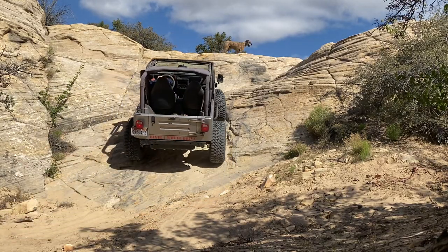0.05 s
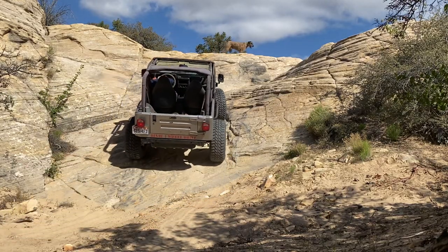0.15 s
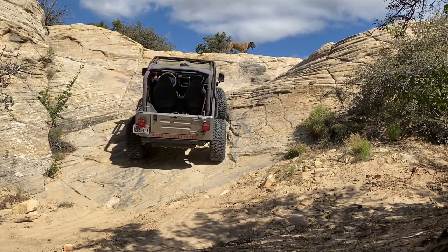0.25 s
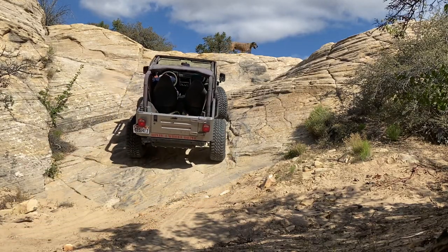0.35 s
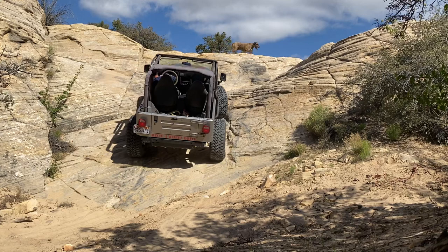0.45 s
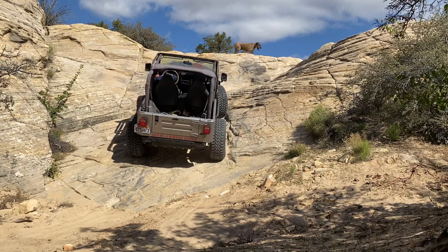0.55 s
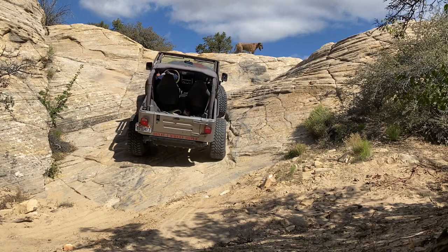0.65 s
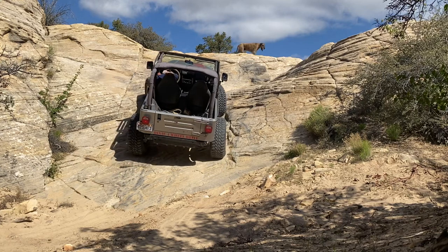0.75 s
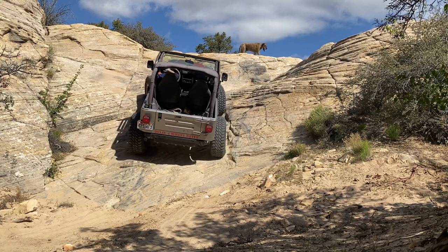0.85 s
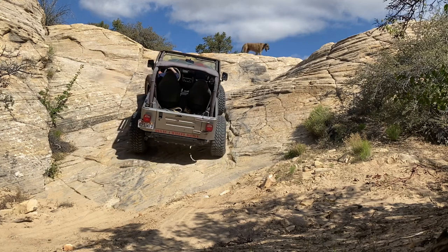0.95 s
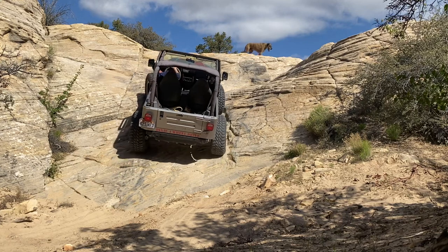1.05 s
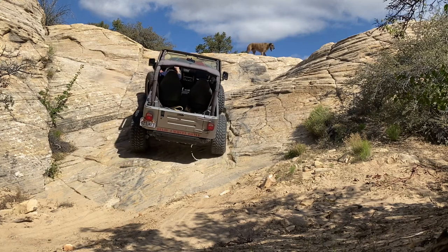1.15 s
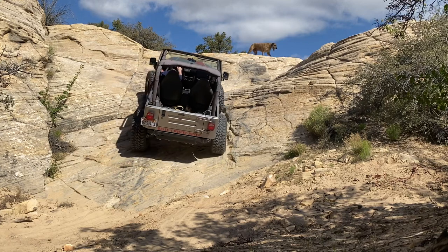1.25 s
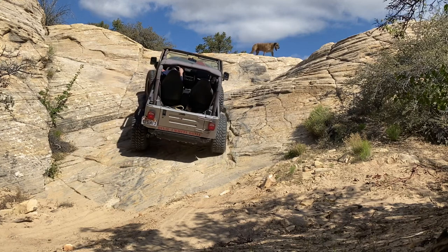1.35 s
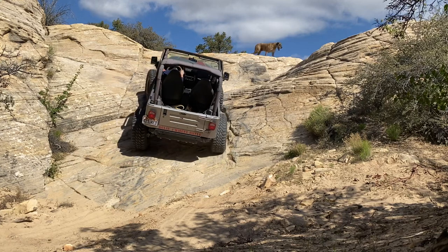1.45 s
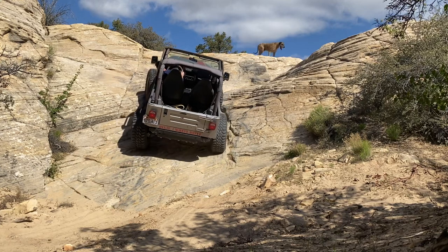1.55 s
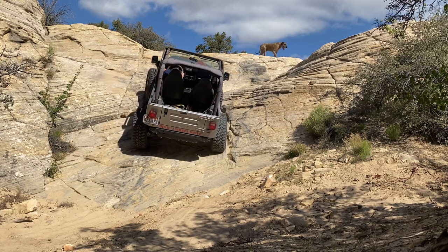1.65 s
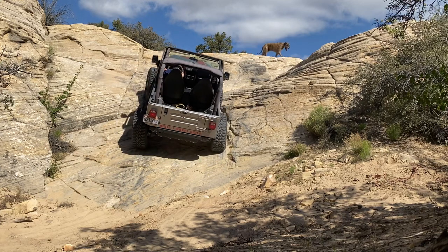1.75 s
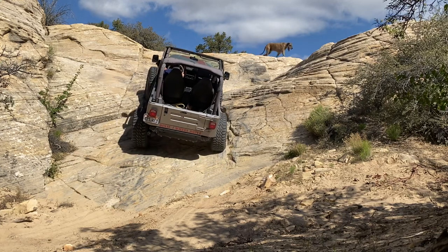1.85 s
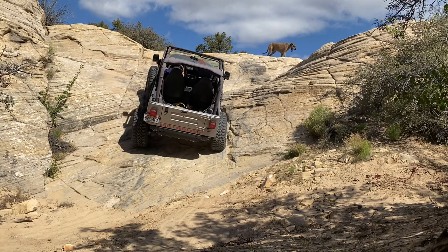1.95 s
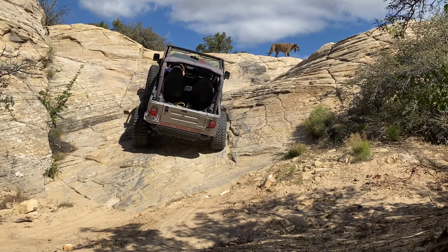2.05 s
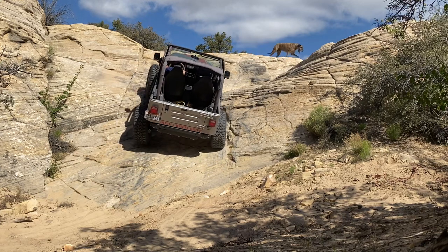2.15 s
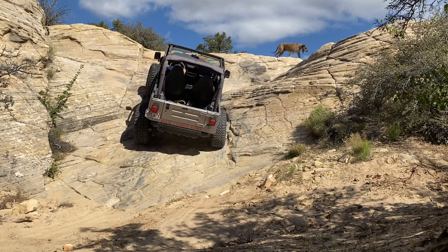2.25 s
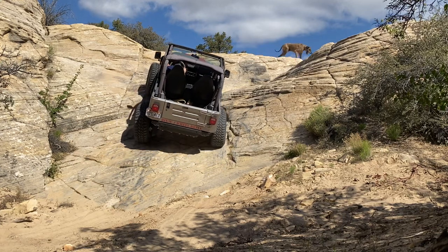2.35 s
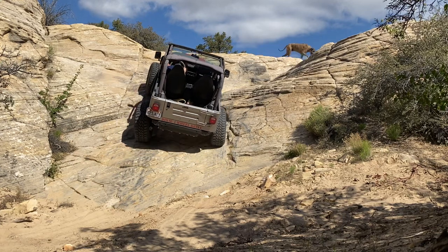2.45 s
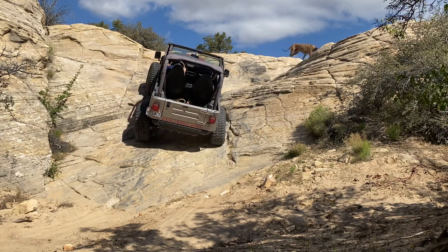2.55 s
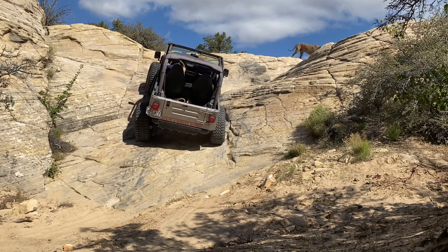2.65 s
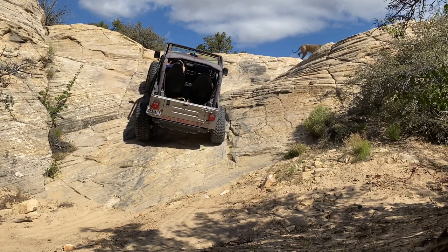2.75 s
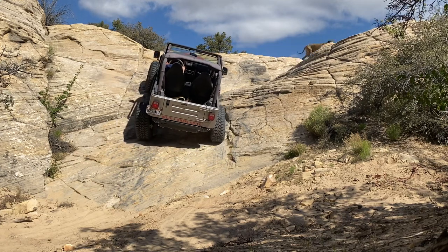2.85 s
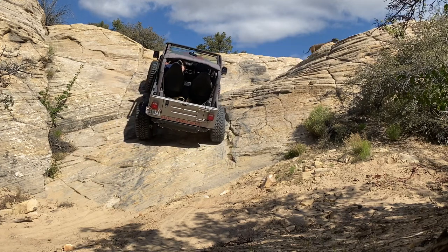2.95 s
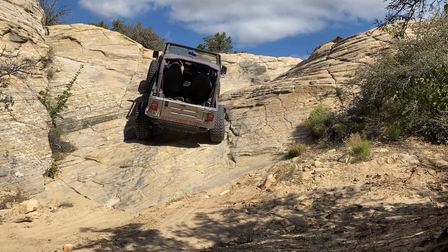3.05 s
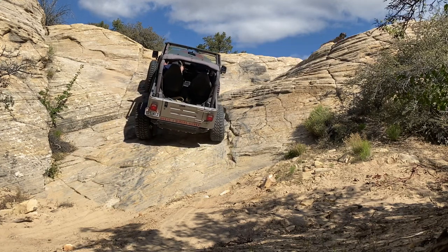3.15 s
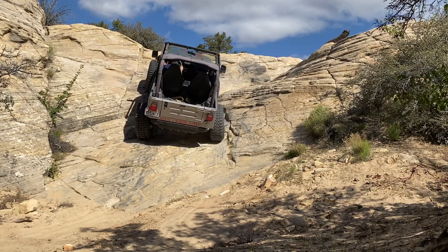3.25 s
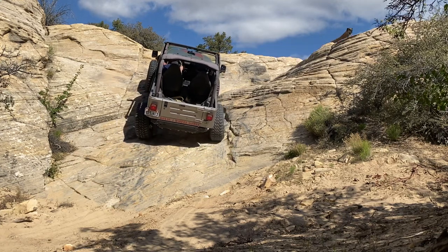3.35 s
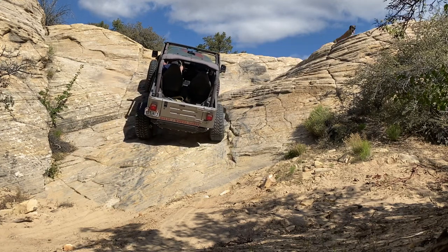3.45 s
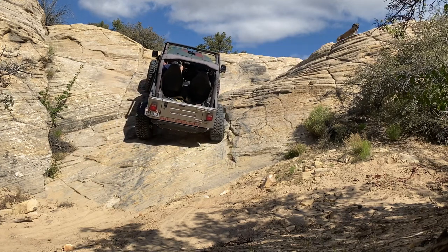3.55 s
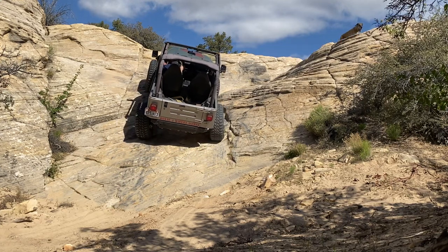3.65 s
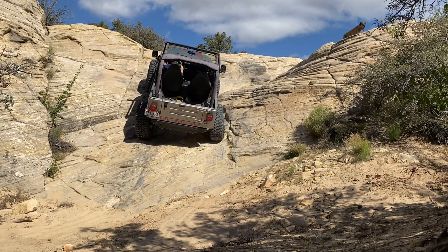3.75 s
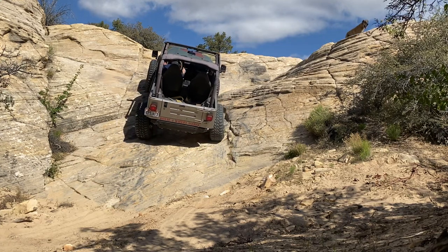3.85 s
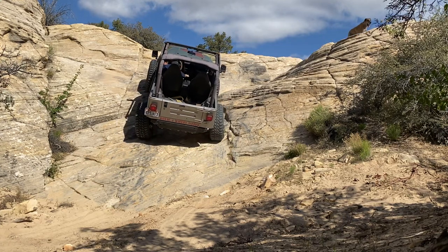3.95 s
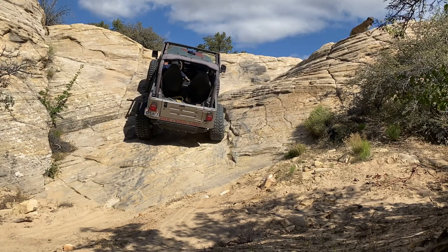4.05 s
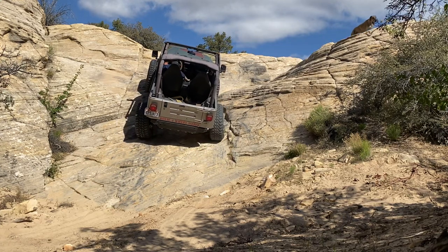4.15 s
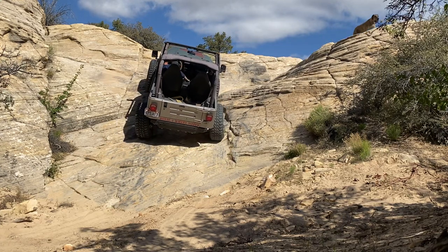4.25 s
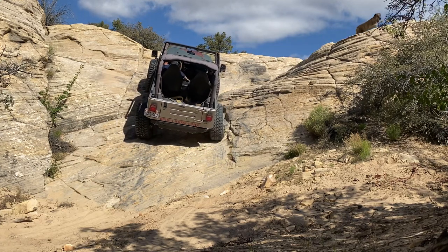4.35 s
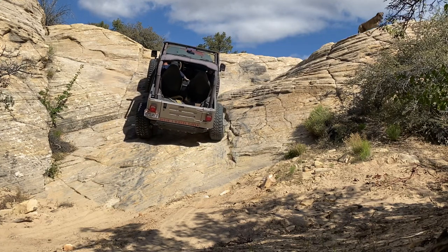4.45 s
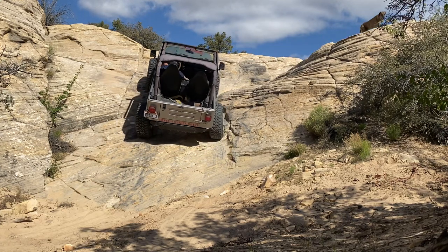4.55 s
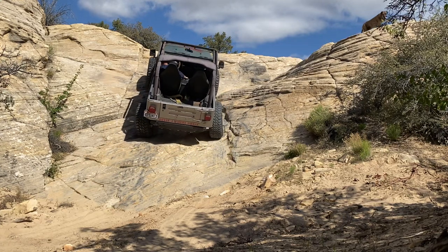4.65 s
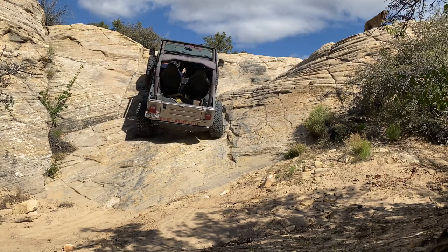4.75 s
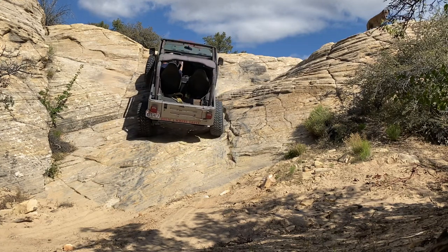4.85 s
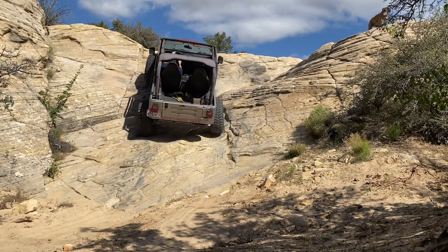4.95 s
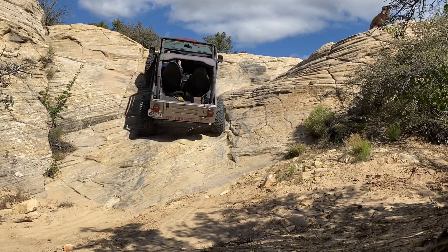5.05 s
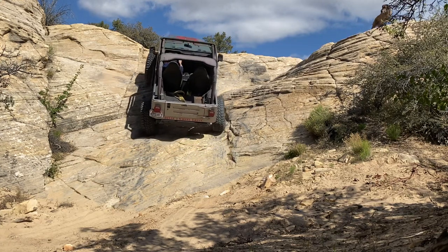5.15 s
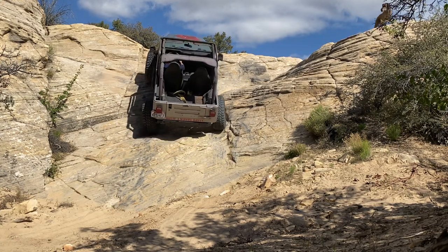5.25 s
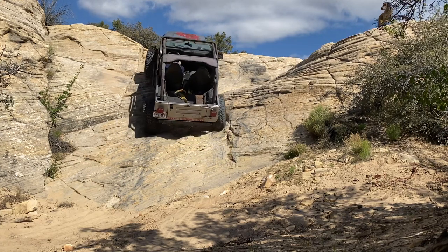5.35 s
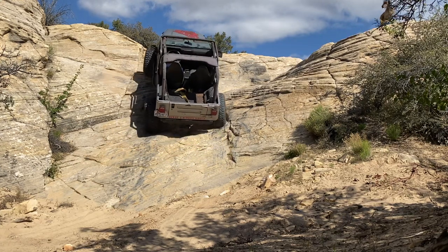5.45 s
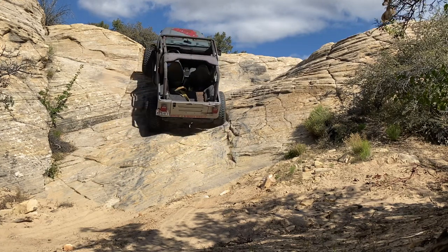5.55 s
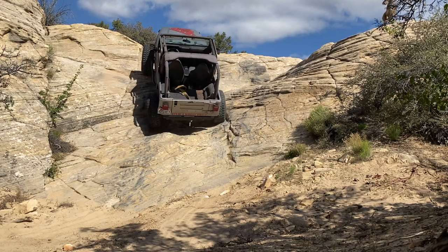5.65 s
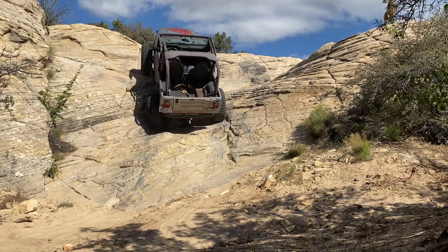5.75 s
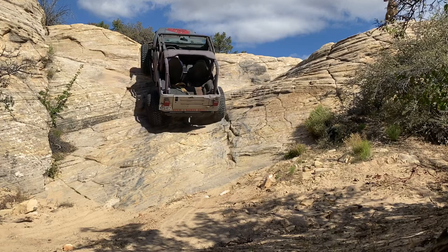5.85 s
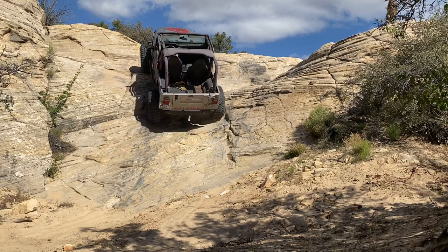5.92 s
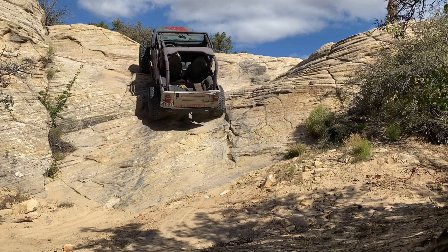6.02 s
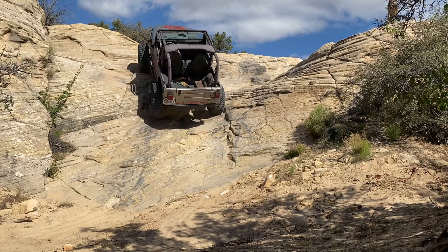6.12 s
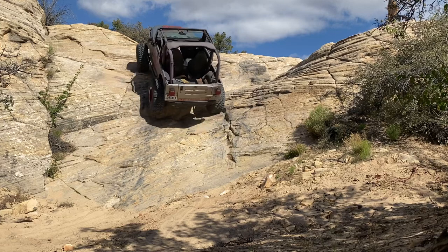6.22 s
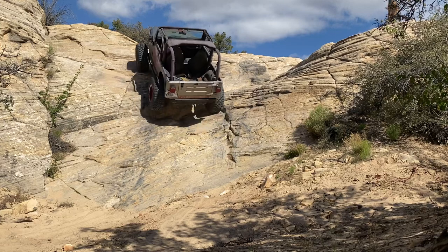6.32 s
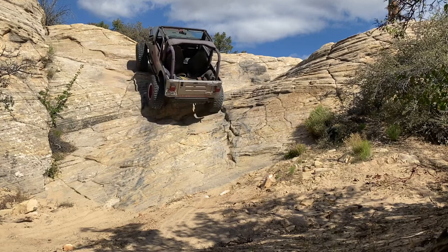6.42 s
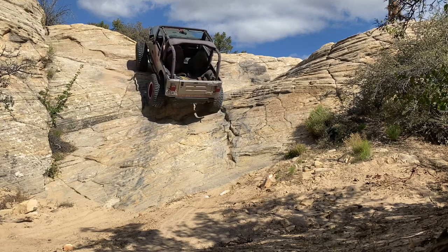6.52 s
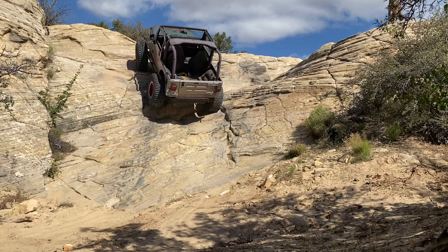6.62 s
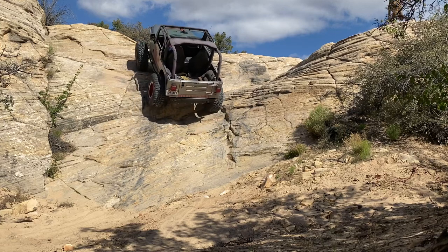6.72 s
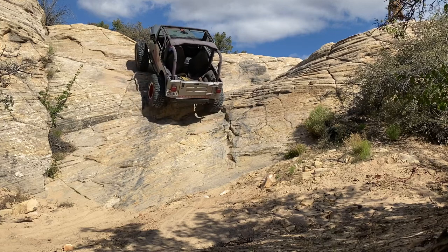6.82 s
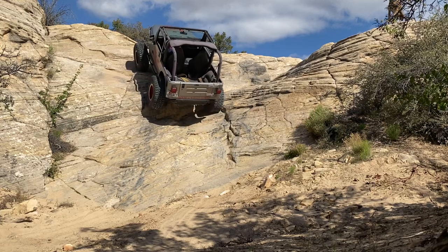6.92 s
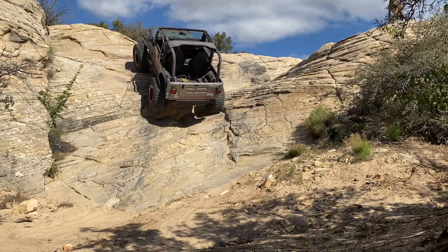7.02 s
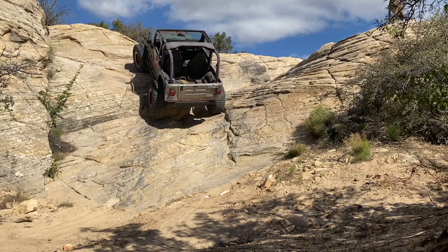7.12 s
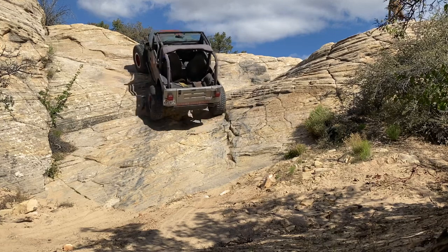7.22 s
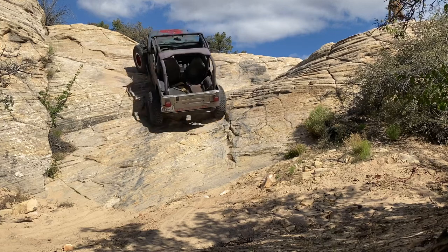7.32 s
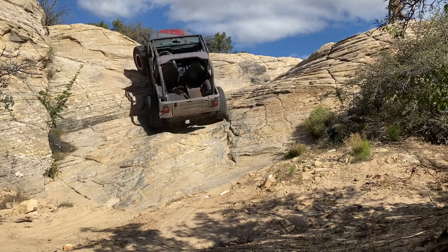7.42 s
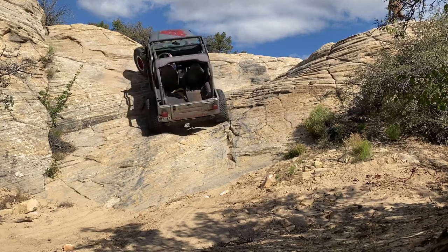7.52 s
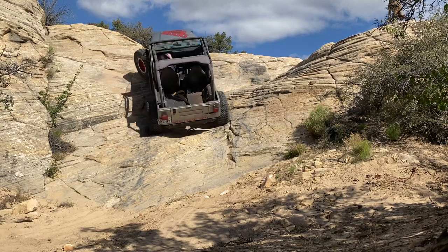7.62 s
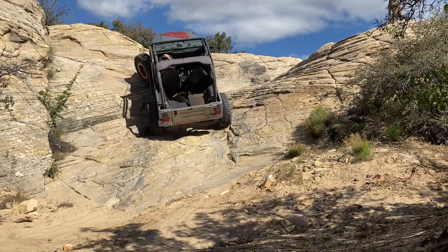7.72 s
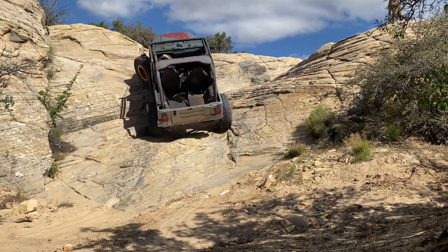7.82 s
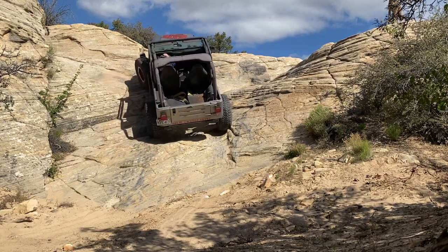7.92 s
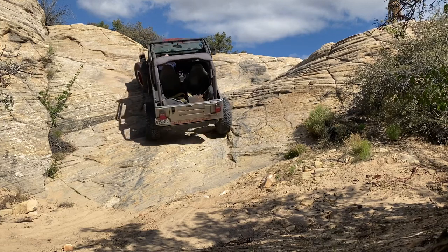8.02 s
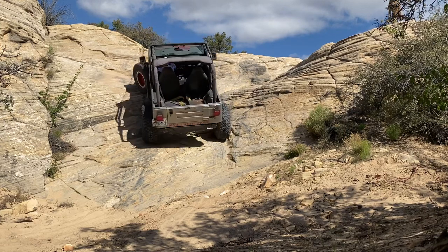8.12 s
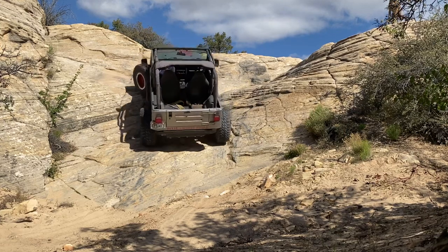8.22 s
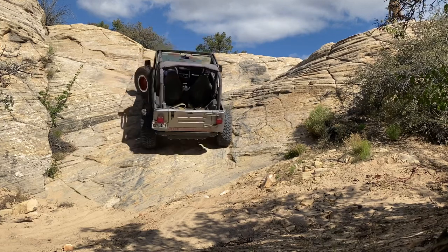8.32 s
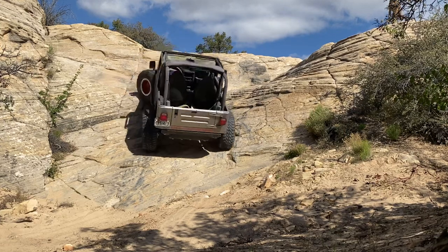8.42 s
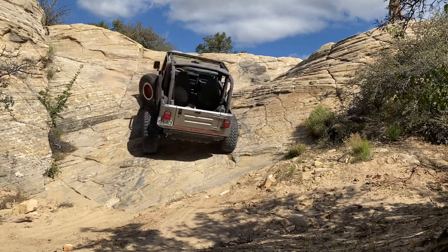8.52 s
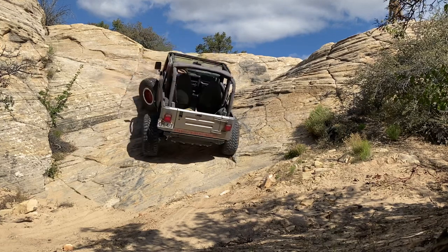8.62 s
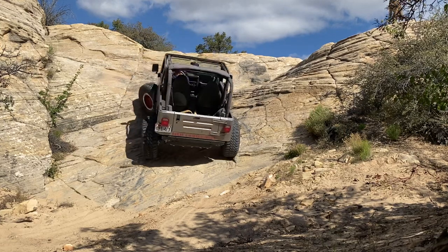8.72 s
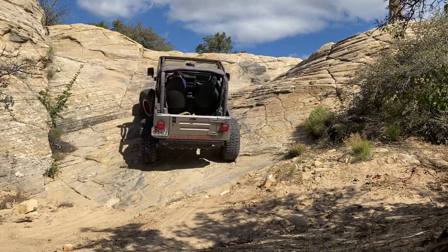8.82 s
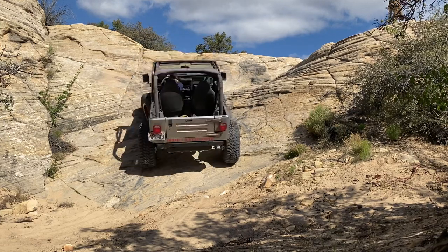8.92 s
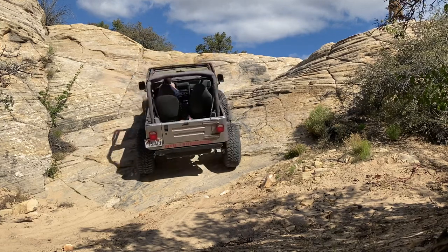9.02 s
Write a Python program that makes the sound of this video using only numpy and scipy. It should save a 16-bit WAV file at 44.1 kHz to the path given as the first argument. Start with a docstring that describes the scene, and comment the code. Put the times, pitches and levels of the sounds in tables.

```python
"""A six-cylinder off-road vehicle crawls up a sandstone ledge; its exhaust drones as a sum of engine orders.
Gas noise pulses at each firing, tyres grind as filtered noise, and the chassis squeaks by gliding tones.
The engine surges twice and sags almost to a stall; then the vehicle rolls back with rumble, scrub and hiss.
It lands with a clatter: bursts of noise excite the decaying modes of the body and its loose parts."""
import sys
import numpy as np
from scipy import signal
from scipy.fft import rfft, irfft
from scipy.io import wavfile
from scipy.ndimage import uniform_filter1d

SR = 44100
rng = np.random.default_rng(int(sys.argv[2]) if len(sys.argv) > 2 else 0)


def store_wav(level_fs):
    """Save 16-bit WAV to argv[1]."""
    pcm = np.round(np.clip(np.atleast_2d(level_fs), -1, 1) * 32767)
    wavfile.write(sys.argv[1], SR, pcm.T.astype(np.int16))


N = 400428
TIME = np.arange(N) / SR
CRAWL_RPM = 1200  # reference engine speed

# the strong exhaust tones as multiples of crank speed; 3 is the firing rate: order
STRONG_ORDERS = (3, 4.5, 6, 7.5, 9, 12)
# how the engine works; above 0 hollowness, the firing tone gives way to the orders around it:
# time_s, exhaust_strength_db, hollowness
ENGINE_LOAD = [(0.0, 2.5, 0.36), (0.45, 1.5, -0.01), (1.2, 2.5, 0.72), (2.05, 1.8, 0.6), (2.8, 0.5, 0.0),
               (4.4, 1.36, -0.1), (4.8, 4.5, 0.13), (5.1, 2.3, -0.07), (5.5, -1.2, -0.19), (5.8, 2, -0.57),
               (6.08, -0.2, -0.46), (6.3, -4.5, 0.52), (6.52, -0.5, 0.41), (6.85, -1.5, -0.19),
               (7.17, 4.5, 0.21), (7.55, -1.5, 0.41), (8.15, -4.5, -0.02), (9.08, 1, 0.14)]
# a tyre slips on the stone, levels before trim: middle_s, length_s, scrub_db, sand_db, chatter_hz
TYRE_SLIPS = [(1.15, 0.78, -50.5, -62, 1900), (2.42, .14, -43.5, -61, 1300), (3.957, 0.85, -49, -60, 1530),
              (4.55, .3, -45.5, -58, 1410), (4.69, .2, -39, -51, 1600), (4.895, 0.5, -38.5, -50.5, 1410),
              (5.203, 0.64, -40.5, -52.5, 1450), (5.87, 0.55, -39.5, -51.5, 1370),
              (5.937, .1, -42, -52, 2620), (6.182, .3, -50.5, -71, 1500), (6.737, 0.12, -44.5, -52, 1500),
              (6.849, 0.18, -49, -68, 1720), (6.997, .12, -43, -58, 1200), (7.6, .2, -48.5, -54, 1450),
              (8.089, 0.61, -36, -46, 1600), (8.35, 0.29, -44, -47.5, 1400),
              (8.865, 0.3, -41.5, -46.5, 2360)]
# colour of crushed sand and cracking stones, with the top treble cut: frequency_hz, level_db
SAND_COLOUR = [(500, -33), (2500, -15.5), (4500, -2.5), (5700, -5), (6800, 0), (8200, -4.5), (11800, -11.5),
               (12800, -27.5), (16000, -21)]


def gain_of(db):
    """Level definition: decibels become an amplitude factor."""
    return 10 ** (np.asarray(db) / 20)


def summed_db(*levels):
    """Incoherent addition: unrelated sounds add by power."""
    return 10 * np.log10(sum(gain_of(db) ** 2 for db in levels))


def evened(x):
    """Normalisation of effective value: scales to rms 1."""
    return x / np.sqrt(np.mean(x ** 2) + 1e-20)


def curves(rows):
    """Linear interpolation: each column of a time table, at every sample."""
    time_s, *columns = np.transpose(rows)
    return [np.interp(TIME, time_s, column) for column in columns]


def read(points, hz):
    """Spectral interpolation: reads a spectrum table on a log-frequency axis."""
    table_hz, value = np.transpose(points)
    return np.interp(np.log(hz + 1), np.log(table_hz + 1), value)


def add(mix, start_s, sound):
    """Linear superposition: mixes a sound in at its start time."""
    part = mix[max(round(start_s * SR), 0):][:len(sound)]
    part += sound[:len(part)]


def drift(hz):
    """Band-limited random fluctuation: low-passed noise of rms 1."""
    response = 1 / (1 + (np.fft.rfftfreq(N, 1 / SR) / hz) ** 4)
    return evened(irfft(rfft(rng.standard_normal(N)) * response, N))


def coloured(x, points, size=4096):
    """Minimum-phase filtering: a causal response of energy 1 has the given spectrum."""
    log_gain = np.log(gain_of(read(points, abs(np.fft.fftfreq(size, 1 / SR)))))
    # the Hilbert transform of the log gain gives the phase of a causal filter
    taps = np.fft.ifft(np.exp(np.conj(signal.hilbert(log_gain)))).real[:size // 2]
    return signal.oaconvolve(x, taps / np.linalg.norm(taps))[:N]


def scatter(x, t60):
    """Diffuse reflection: the rock returns a dense, exponentially dying response of energy 1."""
    t = TIME[:SR // 2]
    taps = rng.standard_normal(len(t)) * gain_of(-60 * t / t60)
    return signal.oaconvolve(x, taps / np.linalg.norm(taps))[:N]


def exhaust(turns, rpm, flutter=.02, stumble=0.19, pipe_s=0.00442, spread=.35):
    """Harmonic synthesis: engine orders meet pipe resonances; firing grows uneven as speed falls."""
    # each order booms where it meets a resonance: speed_rpm, then level_db of each strong order before load
    order_levels = [(500.0, -50.9, -35, -27, -24.5, -17.5, -29.5),
                    (733, -28.5, -36, -12, -24.5, -25.5, -29.5),
                    (949, -10, -21.2, -18.5, -27.7, -32, -24.5),
                    (1200.0, -13.5, -21.5, -24.5, -39.5, -19, -42),
                    (1450.0, -13.5, -30.5, -25, -32, -25, -28), (1667, -13, -25, -13, -30.2, -33, -35),
                    (1900.0, -10, -29.5, -12, -22, -31.5, -35)]
    # change per unit of hollowness, one entry for each strong order: change_db
    hollow_changes = (-12, 5, 6, 3.5, -9, 2)
    out = np.zeros(N)
    load_db, hollowness = curves(ENGINE_LOAD)
    speeds, *levels = np.transpose(order_levels)
    slowing = np.maximum(np.log2(CRAWL_RPM / rpm), 0)
    uneven = 1 + stumble * slowing * drift(14)
    # the pipe delays all strong orders alike; a fixed spread sets their phases
    delayed_turns = turns - rpm / 60 * pipe_s
    for order, level_db, hollow_db in zip(STRONG_ORDERS, levels, hollow_changes):
        db = np.interp(rpm, speeds, level_db) + load_db + hollow_db * hollowness
        phase = 2 * np.pi * order * delayed_turns + spread * order ** 2
        out += gain_of(db) * (1 + flutter * drift(31)) * np.cos(phase)
    return uneven * out


def lope(turns, crank_hz, lope_db=-42, speed_db=5, group_db=5, soft_slope_db=3, uneven_db=2,
         waver=0.12, count=58):
    """Subharmonic modulation: unequal cylinders sound the weaker whole and half orders through the pipe."""
    # colour of the exhaust pipe: frequency_hz, level_db
    pipe_colour = [(20, -13), (45, -6), (75, -4), (100, 5.5), (140, 0), (195, 4), (280, -2.5), (335, -16),
                   (410, -9.5), (480, -15.5), (580, -20), (800, -28)]
    out, frame_s, frame_hz = np.zeros(N), TIME[::64], crank_hz[::64]
    octaves = np.log2(frame_hz / np.median(frame_hz))
    for k in range(2, count):
        order = k / 2
        if order in STRONG_ORDERS:
            continue
        # a slow engine fires softly, which dulls its high orders
        soft_db = soft_slope_db * np.minimum(octaves, 0) * max(order / 6 - 1, 0)
        # the rhythm of each group of three cylinders stands out
        weight_db = group_db * (k % 3 == 0) + soft_db + uneven_db * rng.uniform(-1, 1)
        pipe_db = read(pipe_colour, order * frame_hz)
        size = gain_of(lope_db + pipe_db + speed_db * octaves + weight_db)
        sway_points = 1 + waver * rng.standard_normal(count)
        sway = np.interp(frame_s, np.linspace(0, TIME[-1], count), sway_points)
        tone = np.cos(2 * np.pi * (order * turns + rng.random()))
        out += np.interp(TIME, frame_s, size * sway) * tone
    return out


def firing(turns, sharp, bank):
    """Periodic excitation of rms 1: a burst per firing, alternating between two groups of three cylinders."""
    each_firing = sharp * np.cos(2 * np.pi * 3 * turns)
    strong_weak = bank * np.cos(np.pi * 3 * turns)
    return evened(np.exp(each_firing + strong_weak))


def thumps(turns, revs, level_db=-56, per_load_db=3, per_slowing_db=14, full_below=0.98):
    """Filtered impulses: single firings stand out as thumps when the engine works hard at low speed."""
    # colour of a thump: frequency_hz, level_db
    thump_colour = [(60, -40), (150, -11.5), (250, 0), (370, -0.5), (550, -12), (1500, -40)]
    slowing = np.minimum(-revs, full_below)  # octaves below the crawl
    beats = evened(coloured(firing(turns, sharp=40, bank=.2), thump_colour))
    return gain_of(level_db + per_load_db * curves(ENGINE_LOAD)[0] + per_slowing_db * slowing) * beats


def puffs(turns, puff_db, trim_db=5.0):
    """Modulated flow noise: gas rushes from the tailpipe at each firing."""
    # colour of the gas: frequency_hz, level_db
    puff_colour = [(25, -17.5), (60, 5.5), (130, 6), (240, 4), (330, -0.5), (480, -0.5), (700, -8),
                   (1100, -27), (3000, -54.5), (16000, -84)]
    gas = rng.standard_normal(N) * firing(turns, sharp=.36, bank=.12)
    return coloured(gas * gain_of(puff_db + trim_db), puff_colour)


def grains(per_s, spread_db):
    """Random impact process: sparse clicks of uneven size, rms 1."""
    size = gain_of(spread_db * np.minimum(rng.exponential(1, N), 4))
    struck = rng.random(N) < per_s / SR
    return evened(size * rng.standard_normal(N) * struck)


def grinding(revs, roll_db):
    """Power summation: scrub and sand levels rise with engine speed and rolling, and swell at each slip."""
    fan_db = -47 + 7.5 * revs  # level at a crawl, then dB per doubling of speed
    crunch_db = -58 + 8.7 * revs
    roll_scrub_db, roll_sand_db = -43, -54.5  # at full roll
    scrub, sand = np.zeros(N), np.zeros(N)
    for middle_s, length_s, scrub_db, sand_db, _ in TYRE_SLIPS:
        swell = signal.windows.hann(int(length_s * SR))
        add(scrub, middle_s - length_s / 2, gain_of(scrub_db) * swell)
        add(sand, middle_s - length_s / 2, gain_of(sand_db) * swell)
    slip_scrub_db, slip_sand_db = 20 * np.log10(np.array([scrub, sand]) + 1e-9)
    return (summed_db(fan_db, roll_scrub_db + roll_db, slip_scrub_db),
            summed_db(crunch_db, roll_sand_db + roll_db, slip_sand_db))


def tyres(turns, scrub_db, sand_db, hiss_db=2, grit_db=-5, patchy_db=1.5):
    """Friction and impact noise: fan roar and rubber scrubbing on stone, with sand crushed under the tread."""
    # colour of fan and scrub: frequency_hz, level_db
    scrub_colour = [(100, -30), (450, -10), (800, 1), (1500, -2), (2300, -6.5), (3200, -12.5), (5000, -20),
                    (16000, -63)]
    grip_db = patchy_db * drift(22)
    scrub = rng.standard_normal(N) * firing(turns, sharp=.15, bank=.04)
    scrub += .3 * grains(per_s=1200, spread_db=2.5)
    sand = gain_of(hiss_db) * rng.standard_normal(N)
    sand += gain_of(grit_db) * grains(per_s=3300, spread_db=5.5)
    scrubbing = coloured(scrub * gain_of(scrub_db + grip_db), scrub_colour)
    return scrubbing + coloured(sand * gain_of(sand_db + grip_db), SAND_COLOUR)


def squeaks(trim_db=-1, echo_db=-12, glide=.035):
    """Stick-slip vibration: dry metal gives a wavering, rising tone with two overtones, echoed by the rock."""
    # each squeak, level before trim: start_s, length_s, start_pitch_hz, level_db
    squeak_events = [(0.455, 0.063, 3770, -53.5), (5.571, 0.048, 4270, -54.5), (6.029, 0.095, 3915, -49),
                     (6.625, 0.08, 3914, -48), (6.683, 0.032, 4400, -56), (7.215, 0.036, 3780, -48.5),
                     (7.37, 0.051, 3880, -43), (7.671, 0.038, 4470, -47.5), (7.889, 0.037, 4270, -45.5),
                     (7.93, 0.017, 4870, -43), (8.384, 0.031, 3850, -40), (8.683, 0.097, 3840, -40)]
    # level of a squeak's tone and overtones by frequency, with the top treble cut: frequency_hz, level_db
    squeal_colour = [(4000, 5.5), (8000, -6), (11900, -10.5), (13000, -32), (18000, -50)]
    out, waver = np.zeros(N), 1 + .016 * drift(250)
    for start_s, length_s, start_hz, db in squeak_events:
        n = int(length_s * SR)
        pitch_hz = start_hz * np.linspace(1, 1 + glide, n) * waver[int(start_s * SR):][:n]
        phase = 2 * np.pi * np.cumsum(pitch_hz) / SR
        tone = sum(gain_of(read(squeal_colour, k * start_hz)) * np.sin(k * phase) for k in (1, 2, 3))
        add(out, start_s, gain_of(db + trim_db) * tone * signal.windows.tukey(n, .7))
    return out + gain_of(echo_db) * scatter(out, t60=0.4)


def skids(trim_db=-4, width_hz=620):
    """Resonant friction: slipping rubber chatters in a broad resonance that swells and fades."""
    out, hz = np.zeros(N), np.fft.rfftfreq(SR, 1 / SR)
    for middle_s, length_s, scrub_db, _, centre_hz in TYRE_SLIPS:
        resonance = 1 / (1 + (2 * (hz - centre_hz) / width_hz) ** 2)
        chatter = evened(irfft(rfft(rng.standard_normal(SR)) * resonance))
        swell = signal.windows.hann(int(min(length_s, 1) * SR))
        add(out, middle_s - length_s / 2, gain_of(scrub_db + trim_db) * swell * chatter[:len(swell)])
    return out


def bursts(times, levels_db, t60):
    """Exponential decay: a short, dying burst of noise at each time."""
    out, t = np.zeros(N), TIME[:SR // 4]
    for start_s, db in zip(times, levels_db):
        add(out, start_s, gain_of(db - 60 * t / t60) * rng.standard_normal(len(t)))
    return out


def clatter(peak_db, ragged_db=3.5, landing_s=8.48, rise_db_per_s=266, fall_db_per_s=175):
    """Exponential growth and decay: ragged noise of loose parts builds up to the landing and dies away."""
    after_s = TIME - landing_s
    shape_db = np.minimum(rise_db_per_s * after_s, -fall_db_per_s * after_s)
    level_db = peak_db + np.maximum(shape_db, -150) + ragged_db * drift(90)
    return gain_of(level_db) * rng.standard_normal(N)


def knocks(thud_trim_db=-1, rattle_trim_db=-1, ring_trim_db=-9):
    """Modal excitation: each blow thuds, shakes loose parts and rings the steel body."""
    # blows on the body, levels before trim: start_s, thud_db, rattle_db
    blow_events = [(4.473, -27.5, -43), (6.717, -28, -46), (6.955, -30.5, -34.5), (8.468, -10.5, -13),
                   (8.484, -6, -20), (8.754, -17.5, -30)]
    # what the body rings with: frequency_hz, relative level_db, t60_s
    body_modes = [(284, -7.5, 0.21), (336, -9, 0.27), (467, 0, 0.22), (505, -14, 0.25), (550, -3.5, 0.14),
                  (596, -16, 0.39), (646, -13, 0.3), (743, -19, 0.21), (980, -32, 0.36),
                  (1260, -17.5, 0.17), (1410, -27, 0.22), (1593, -20, 0.41), (2960, -15.5, 0.15)]
    # colour of the dense thud: frequency_hz, level_db
    thud_colour = [(60, -19.5), (170, 3), (300, 2.5), (600, 2), (850, -12.5), (1400, -16), (3000, -39.5),
                   (16000, -67)]
    # colour of the rattling loose parts: frequency_hz, level_db
    rattle_colour = [(200, -2), (900, 4), (2000, 0), (3500, -7), (7000, -12), (11000, -18), (16000, -45)]
    times, thuds_db, rattles_db = np.transpose(blow_events)
    t = TIME[:SR // 2]
    blows = bursts(times, thuds_db, t60=0.14) + clatter(peak_db=-14)
    ring = sum(gain_of(db - 60 * t / t60) * np.sin(2 * np.pi * hz * t) for hz, db, t60 in body_modes)
    ringing = signal.oaconvolve(blows, ring / np.linalg.norm(ring))[:N]
    shaken = bursts(times, rattles_db, t60=0.064) + clatter(peak_db=-22)
    thud = gain_of(thud_trim_db) * coloured(blows, thud_colour)
    rattle = gain_of(rattle_trim_db) * coloured(shaken, rattle_colour)
    return thud + gain_of(ring_trim_db) * ringing + rattle


def cracks(trim_db=-7):
    """Brittle fracture: small stones burst under the tread as short, dying noise."""
    # stones cracking, levels before trim: start_s, level_db
    crack_events = [(5.5842, -40.5), (6.3475, -53), (6.5234, -47), (6.707, -47), (6.728, -44), (7.007, -41),
                    (7.7867, -51), (7.932, -42), (8.0052, -34), (8.4847, -22.5), (8.6907, -35),
                    (8.948, -33)]
    times, levels_db = np.transpose(crack_events)
    return coloured(bursts(times, levels_db + trim_db, t60=0.078), SAND_COLOUR)


def ports(direct, diffuse):
    """Spatial coherence: two microphone ports share direct sound and hear scattered sound in opposite phase."""
    # likeness of the two ports, limited to 0-1 when used: frequency_hz, likeness
    port_likeness = [(100, 1), (300, 1.1), (600, 0.7), (1200, 0.76), (2000, 2.5), (4000, 0.52),
                     (8000, 0.03), (12000, 0.4)]
    # phase by which left leads: frequency_hz, lead_rad
    left_lead = [(0, 0), (300, .05), (1000, .3), (2500, 1.2), (3500, 2.3), (5200, 2.2), (6600, 3.5),
                 (8800, 2.2), (11000, 1.5), (16000, 2)]
    # left minus right: frequency_hz, difference_db
    left_tilt = [(60, -.4), (130, -.9), (280, -.4), (520, 1.2), (750, 0), (1200, -4.5), (2400, -3.5),
                 (4400, -2), (8000, -1.4), (14000, -.4)]
    hz = np.fft.rfftfreq(N, 1 / SR)
    same = np.clip(read(port_likeness, hz), 0, 1)
    direct = rfft(direct) * np.sqrt((1 + same) / 2)
    diffuse = rfft(diffuse) * np.sqrt((1 - same) / 2)
    # half of each difference goes to either port
    turn = np.exp(.5j * read(left_lead, hz)) * gain_of(read(left_tilt, hz) / 2)
    return irfft(np.array([(direct + diffuse) * turn, (direct - diffuse) / turn]), N)


def scene():
    """Common excitation: the crank drives all engine sounds; tyres and chassis add theirs, the rock scatters."""
    # engine speed before flywheel smoothing: time_s, speed_rpm
    engine_speed = [(0.0, 1148), (0.42, 1217), (1.63, 1119), (2.32, 1209), (3.48, 1163), (4.45, 1223),
                    (5.12, 1853), (5.36, 1923), (5.61, 1256), (5.74, 1312), (5.94, 1786), (6.26, 1041),
                    (6.43, 767), (6.69, 526), (6.96, 500), (7.17, 761), (7.46, 931), (7.83, 965),
                    (8.21, 801), (8.75, 663), (9.08, 724)]
    # the vehicle rolls back down: time_s, level_db relative to full roll
    roll_back = [(6.9, -34), (7.1, -6.5), (7.8, -5), (7.95, -1), (8.6, 0), (9.08, -1.5)]
    flywheel_s, roll_rumble_db, lope_per_gas = 0.064, -35.5, .45
    rpm = uniform_filter1d(curves(engine_speed)[0], int(flywheel_s * SR), mode="nearest")
    crank_hz = rpm / 60
    turns = np.cumsum(crank_hz) / SR
    revs = np.log2(rpm / CRAWL_RPM)  # octaves above the crawl
    roll_db, = curves(roll_back)
    # gas level at a crawl, dB per doubling of speed, and load
    gas_db = -40.5 + 5.9 * revs + curves(ENGINE_LOAD)[0]
    # the low rumble of rolling shares the dull colour of the exhaust gas
    puff_db = summed_db(gas_db, roll_rumble_db + roll_db)
    scrub_db, sand_db = grinding(revs, roll_db)
    effort = gain_of(lope_per_gas * (gas_db - np.median(gas_db)))
    drone = exhaust(turns, rpm) + effort * lope(turns, crank_hz) + thumps(turns, revs)
    # two independent draws: one direct, one scattered
    rush, scattered_rush = (puffs(turns, puff_db) + tyres(turns, scrub_db, sand_db) + skids()
                            for _ in range(2))
    chassis = knocks() + gain_of(6.5) * (cracks() + squeaks())
    return ports(drone + rush + chassis, scattered_rush + scatter(chassis, t60=0.056))


def record(dry, edge_hz=15800):
    """Saturation and band limitation: the loudest peaks are rounded off, then the top treble is cut."""
    rounded = dry / (1 + (dry / .95) ** 8) ** (1 / 8)
    low_pass = signal.firwin(511, edge_hz, window=("kaiser", 9), fs=SR)
    return signal.oaconvolve(rounded, low_pass[None], "same")


dry = scene()
out = record(dry)
store_wav(out)
```